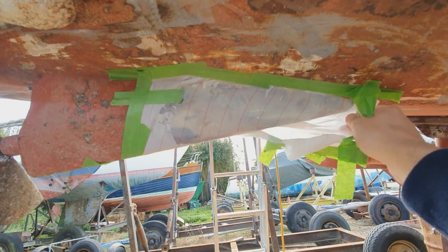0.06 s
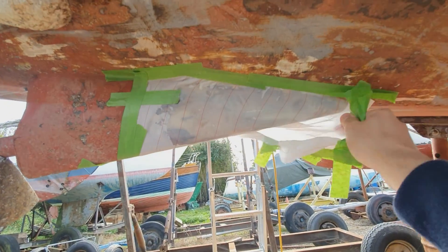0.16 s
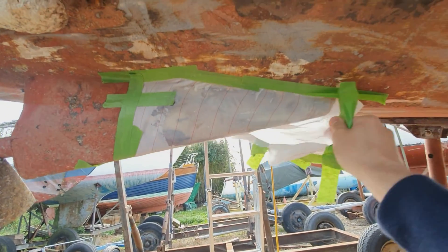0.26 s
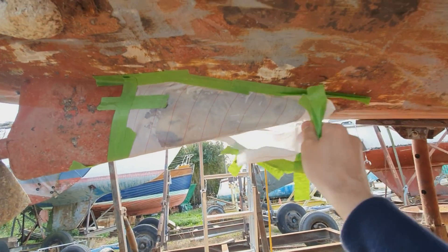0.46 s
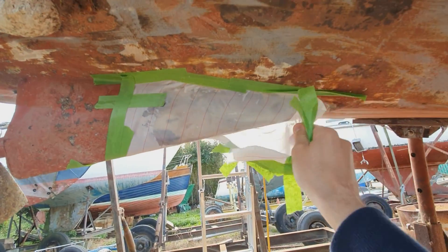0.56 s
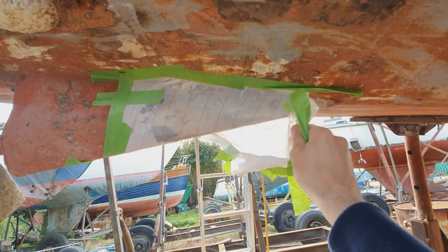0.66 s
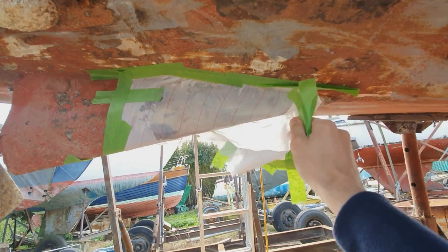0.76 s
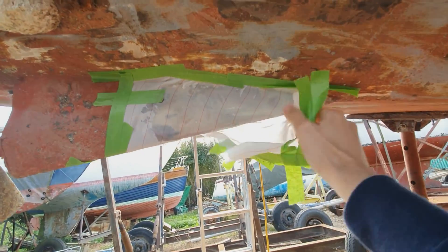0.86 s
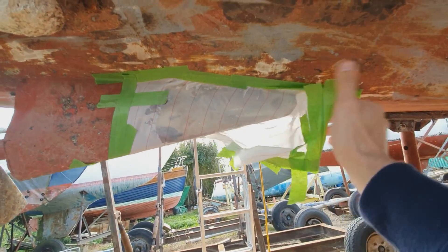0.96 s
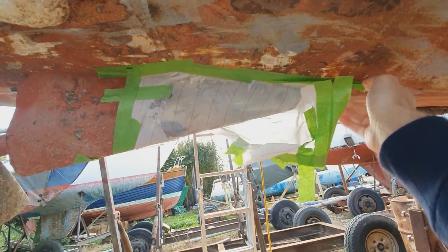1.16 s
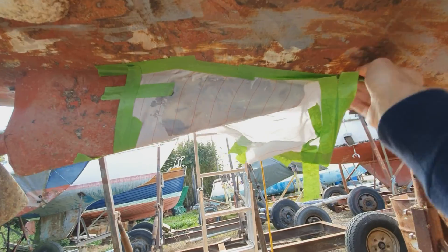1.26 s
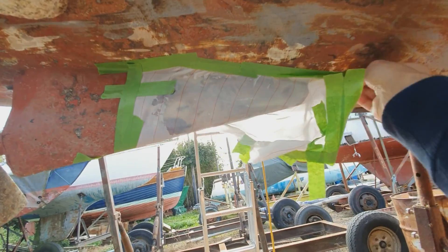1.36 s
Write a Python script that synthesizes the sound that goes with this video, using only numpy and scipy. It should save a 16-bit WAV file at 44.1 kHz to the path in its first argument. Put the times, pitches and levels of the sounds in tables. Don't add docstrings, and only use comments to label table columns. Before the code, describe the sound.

A close tape rip builds in two quick pulls, dense crackle and snaps drumming on taut plastic, stops abruptly, then slight rustles fade into dull outdoor yard noise and far machinery hum, in stereo leaning right.

```python
import sys
import numpy as np
from scipy import signal
from scipy.fft import irfft
from scipy.io import wavfile
from scipy.ndimage import uniform_filter1d, map_coordinates

SR = 44100
rng = np.random.default_rng(int(sys.argv[2]) if len(sys.argv) > 2 else 0)


def wav_out(sig):
    wavfile.write(sys.argv[1], SR, np.round(np.clip(np.atleast_2d(sig).T, -1, 1) * 32767).astype(np.int16))


def boost_factor(decibels):
    exponent = np.asarray(decibels, float) / 20
    return 10 ** exponent


N = 61739


def evened(x):
    return x / np.sqrt(np.mean(x ** 2) + 1e-20)


def lumps(size):
    once = uniform_filter1d(rng.standard_normal(N), size=size)
    return evened(uniform_filter1d(once, size=size))


def read(points, hz):
    f, value = np.transpose(points)
    return np.interp(np.log(hz + 1), np.log(f + 1), value)


def colour(x, points):
    hz = abs(np.fft.fftfreq(2048, 1 / SR))
    log_gain = np.log(boost_factor(read(points, hz)))
    response = np.exp(log_gain - 1j * signal.hilbert(log_gain).imag)[:1025]
    return signal.oaconvolve(x, irfft(response)[:1024])[:N]


def resonate(x, hz, width):
    turn = np.exp(2j * np.pi * np.cumsum(hz * np.ones(len(x))) / SR)
    r = np.exp(-np.pi * width / SR)
    smooth = signal.lfilter([1 - r], [1, -r], x / turn + 1e-18)
    return 2 * (turn * smooth).real


# pitch_hz, level_db (per Hz)
WASH_SPECTRUM = [(30, -35.5), (55, -7.5), (170, -16), (260, -23), (900, -35.5), (1400, -37), (2600, -46.5),
                 (4500, -57.5), (15500, -64)]
# pitch_hz, likeness (0 to 1)
WASH_LIKENESS = [(60, 0.82), (150, 0.75), (300, 1), (700, 0.17), (1500, 0.17), (4000, 0.26)]


def wash():
    level_db, lag_s, tilt_db, patch_db = -53, 0.00014, -3, 1.3
    frames, hz = N // 512 + 5, np.fft.rfftfreq(2048, 1 / SR)
    a, b, c, d, patches = rng.standard_normal((frames, 1025, 5)).T
    patches = uniform_filter1d(patches, size=20, axis=0)
    patches = evened(uniform_filter1d(patches, size=6, axis=1))
    same = np.clip(read(WASH_LIKENESS, hz), -1, 1)[:, None]
    right = a + 1j * b
    left = same * right + np.sqrt(1 - same ** 2) * (c + 1j * d)
    far = np.exp(-2j * np.pi * hz * lag_s) * boost_factor(tilt_db * np.log2(1 + hz / 3000))
    z = np.array([far[:, None] * left, right])
    z *= boost_factor(read(WASH_SPECTRUM, hz)[:, None] + patch_db * patches)
    middle = (hz > 200) & (hz < 2000)
    share = np.sum(abs(z[:, middle]) ** 2) / np.sum(abs(z) ** 2)
    noise = signal.istft(z, nperseg=2048, noverlap=1536)[1][:, :N]
    return boost_factor(level_db) * evened(noise) / np.sqrt(share)


# pitch_hz, width_hz, level_db
HUM_LINES = [(56.7, 16, -43.5), (80.3, 31, -47.5), (98.74, 8.1, -44), (144.1, 13, -45.5), (167, 33, -59),
             (287.3, 13, -63), (1267, 58, -69)]


def hum():
    out = 0
    noise = rng.standard_normal((len(HUM_LINES), N + SR))
    for draw, (hz, width, db) in zip(noise, HUM_LINES):
        line = resonate(resonate(draw, hz, width), hz, width)
        out = out + boost_factor(db) * evened(line[SR:])
    return out


def clicks(per_s, spread_db):
    sign, chance, size = rng.random((N, 3)).T
    size_db = spread_db * np.minimum(-np.log(1 - size), 3.01)
    return evened(np.sign(sign - .5) * (chance < per_s / SR) * boost_factor(size_db))


def crackle(spectrum):
    cracks_per_s, spread_db, fizz_db = 2500, 4.2, -4
    own_share = 0.49

    def cracks():
        grains = clicks(cracks_per_s, spread_db) + boost_factor(fizz_db) * rng.standard_normal(N)
        return colour(grains, spectrum)

    shared, left, right = cracks(), cracks(), cracks()
    return evened(np.sqrt(1 - own_share) * shared + np.sqrt(own_share) * np.array([left, right]))


# pitch_hz, width_hz, level_db
SHEET_MODES = [(190, 100, 2), (360, 100, -1), (510, 100, -3), (605, 80, -1), (712, 70, 1), (850, 120, -4),
               (985, 130, -1), (1090, 130, -2), (1500, 220, -5), (1890, 220, 0), (2750, 350, 6)]


def drum(x, pitch):
    tension_db = 11
    out = 0
    for k, (hz, width, db) in enumerate(SHEET_MODES):
        push = x * boost_factor(-tension_db * np.log2(hz / pitch) ** 2)
        out = out + (-1) ** k * boost_factor(db) * resonate(push, hz, width) * np.sqrt(300 / width)
    return out


# start_s, crackle level_db, drum_db (re crackle), sheet pitch_hz
PULL_STROKES = [
    [(0, -49.5, -29, 900), (.04, -48, 0, 860), (.075, -57.5, -5.5, 910), (.135, -59, 9, 1050),
     (.145, -47.5, 2.5, 900), (.2, -36.5, -6.5, 945), (.27, -33, -5, 1134), (.35, -38, 2, 1080),
     (.383, -40.5, 0, 960)],
    [(.386, -34, -8, 1060), (.42, -29.5, -1, 1040), (.47, -29, 3, 980), (.495, -23.5, 0, 876),
     (.515, -23, 1.5, 700), (.555, -26.5, 0.5, 630), (.575, -31.5, 5, 578), (.595, -44, -4, 630),
     (.665, -63, 2, 680)],
]


def pulls(clump):
    t = np.arange(N) / SR
    s, db, drum_db, hz = np.vstack(PULL_STROKES).T
    high = boost_factor(np.interp(t, s, db)) * (t < s[-1]) * clump
    low = high * boost_factor(np.interp(t, s, drum_db))
    wander = 1 + .12 * lumps(size=400)
    pitch = np.clip(np.interp(t, s, hz), 300, 2000) * wander
    return high, low, pitch


def hull(x):
    t60_s, changes_per_s, patterns = .04, 12, 6
    t, out = np.arange(2000) / SR, 0
    place = np.arange(N) / SR * changes_per_s % patterns
    for k in range(patterns):
        taps = rng.standard_normal((2, 2000)) * boost_factor(-60 * t / t60_s) * (t > .0008)
        taps = taps / np.linalg.norm(taps, axis=1)[:, None]
        gap = np.minimum(abs(place - k), patterns - abs(place - k))
        window = np.cos(np.pi / 2 * np.minimum(gap, 1))
        out = out + signal.fftconvolve(x * window, taps, axes=1)[:, :N]
    return out


# start_s, peak level_db, low_share_db
SNAP_EVENTS = [(0.0394, -57, -13), (0.1051, -32, 20), (0.1224, -29, 5), (0.1418, -27, 2),
               (0.1496, -31, -20), (0.159, -25.5, -15), (0.1865, -36, -24.5), (0.1902, -42.5, 9),
               (0.2084, -30, -18), (0.2782, -26, 9), (0.3537, -18.5, 2), (0.39, -10.5, -16),
               (0.398, -12, 12), (0.4108, -17, -11), (0.4217, -8, -11), (0.438, -25, -8), (0.446, -29, 13),
               (0.4744, -18.5, -3), (0.5018, -32, -18), (0.5129, -13.5, 10), (0.5219, -35, -17.5),
               (0.5661, -4.5, 4), (0.6178, -51, -5), (0.6566, -38.5, 14), (0.6713, -27.5, 6),
               (0.6955, -67, -6), (0.7193, -31, 0), (0.7354, -32, -13), (1.053, -62, -5),
               (1.0884, -51.5, 0.5)]
# pitch_hz, level_db
CRACK_SPECTRUM = [(200, -9.5), (1000, -4), (2200, -4.5), (4500, -5.5), (7000, -10.5), (8300, -16),
                  (11500, -12.5), (15500, -18.5)]


def snaps(pitch):
    t60_s, trim_db = .009, 1
    burst, thud = np.zeros((2, N))
    draws = rng.standard_normal((len(SNAP_EVENTS), 800))
    fade = boost_factor(-60 * np.arange(800) / SR / t60_s)
    for (start, peak_db, share_db), draw in zip(SNAP_EVENTS, draws):
        at = round(start * SR)
        burst[at:at + 800] += boost_factor(peak_db + trim_db) * fade * draw
        thud[at] -= boost_factor(peak_db + share_db + 7)
    return colour(burst, CRACK_SPECTRUM) + drum(thud, pitch)


FLAP_STARTS = [.04, .107, .186, .275, .389, .4215, .4465, .46, .512, .521, .5645, .572, .697, .797, .85]
# level_db, pitch_hz
FLAP_POPS = [(-48, 1000), (-28.5, 800), (-23.5, 1000), (-19, 1800), (-14.5, 1160), (-11, 1100), (-20, 690),
             (-27, 200), (-9.5, 720), (-15.5, 810), (-13, 700), (-27, 220), (-31, 640), (-40, 530),
             (-38, 580)]


def flaps():
    cycles = 7
    out, t = np.zeros(N), np.arange(3000) / SR
    for s, (db, hz) in zip(FLAP_STARTS, FLAP_POPS):
        pop = boost_factor(db - 60 * t * hz / cycles) * np.sin(2 * np.pi * hz * t)
        out[round(s * SR):][:3000] -= pop
    return out


# start_s, length_s, level_db, low_share_db
RUSTLE_PUFFS = [
    (0.664, 0.039, -48, -7),
    (0.693, 0.013, -38, -4),
    (0.704, 0.05, -52.5, -0.5),
    (0.738, .1, -65.5, 6),
    (0.762, 0.019, -67, -7),
    (0.835, 0.13, -62, 0),
    (1.017, 0.1, -97, 3.5),
    (1.375, .05, -58, -23),
]


def rustles(clump):
    t = np.arange(N) / SR
    loose = low = 0
    for start, length, level_db, share_db in RUSTLE_PUFFS:
        u = np.clip((t - start) / length, 0, 1)
        puff = boost_factor(level_db) * np.sin(np.pi * u ** 0.8) * clump
        loose = loose + puff
        low = low + puff * boost_factor(share_db)
    return loose, low


def brush():
    start_s, length_s, level_db, pitch_hz, width_hz = 1.235, 0.19, -69, 6300, 2300
    u = np.clip((np.arange(N) / SR - start_s) / length_s, 0, 1)
    hiss = rng.standard_normal(N)
    for _ in range(3):
        hiss = resonate(hiss, pitch_hz, width_hz)
    return boost_factor(level_db + 2 * lumps(size=300)) * np.sin(np.pi * u ** 0.42) * evened(hiss)


# pitch_hz, level_db
FILM_SPECTRUM = [(200, -14), (1500, -4.5), (3000, 0), (6500, -1), (8300, -9), (11500, -6.5), (15500, -12)]


def peel():
    slips_per_s, slip_spread_db, clump_db, stick_db = 560, 0, -0.5, 2.2
    clump = boost_factor(clump_db * lumps(size=300) + stick_db * lumps(size=60))
    high, pull_low, pitch = pulls(clump)
    loose, loose_low = rustles(clump)
    slips = evened(drum(clicks(slips_per_s, slip_spread_db), pitch))
    tearing = high * crackle(CRACK_SPECTRUM) + loose * crackle(FILM_SPECTRUM)
    drumming = (pull_low + loose_low) * slips
    return tearing + drumming + snaps(pitch) + flaps() + brush()


# start_s, lag_s
FAR_EAR_LAGS = [(0, 0.00033), (.3, 0.0003), (.45, 0.00021), (1.0, 0.0002), (1.4, 0.00034)]
# pitch_hz, level_db
FAR_EAR_SHADOW = [(300, 0), (1000, -3.2), (2000, -1), (3500, -8.5), (6500, -10.5), (8500, 2), (11500, -11),
                  (15000, -1.5)]


def scene():
    near_db, hull_db = 3.5, -10
    left, right = boost_factor(near_db) * peel()
    samples = np.arange(N)
    late = samples - SR * np.interp(samples / SR, *np.transpose(FAR_EAR_LAGS))
    far = colour(map_coordinates(left, [late], order=5), FAR_EAR_SHADOW)
    ears = np.array([far, right])
    return ears + boost_factor(hull_db) * hull(ears) + wash() + hum()


def low_pass(x):
    return signal.sosfilt(signal.butter(12, 16060, fs=SR, output="sos"), x)


def record(dry):
    edge = signal.firwin(255, 15900, window=("kaiser", 9), fs=SR)
    mix = signal.oaconvolve(dry, edge[None], "same")
    return low_pass(mix)


dry = scene()
out = record(dry)
wav_out(out)
```